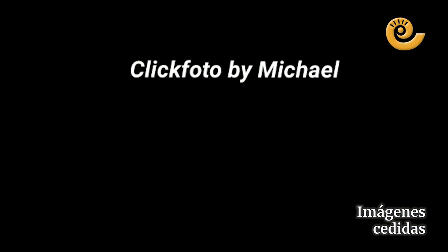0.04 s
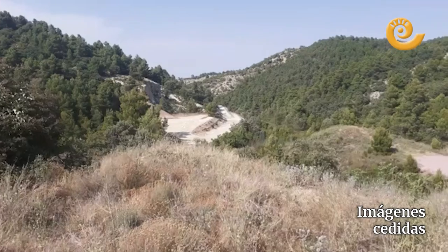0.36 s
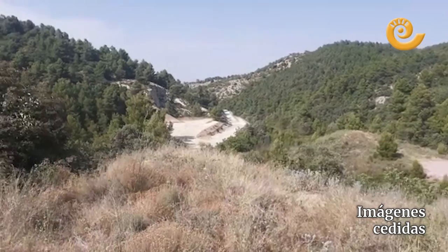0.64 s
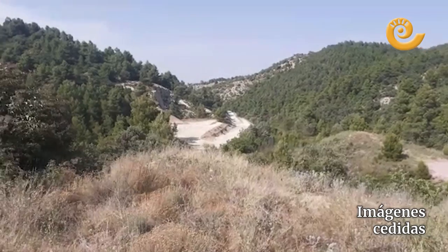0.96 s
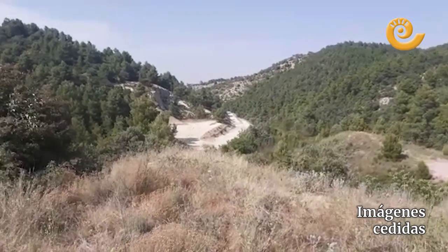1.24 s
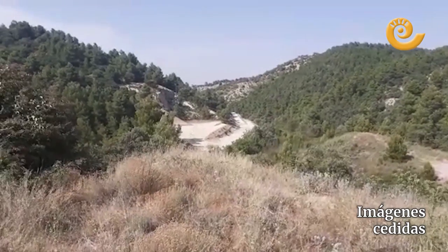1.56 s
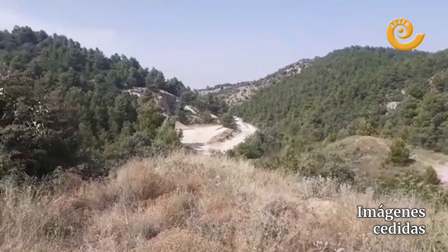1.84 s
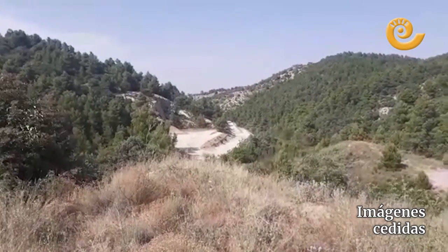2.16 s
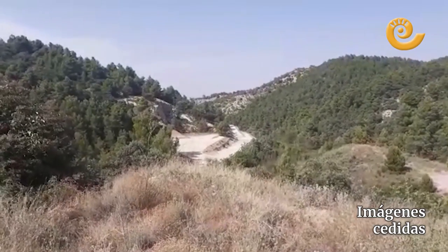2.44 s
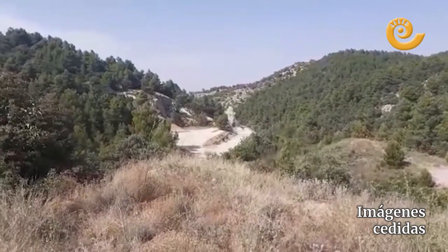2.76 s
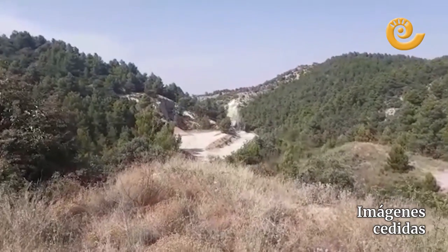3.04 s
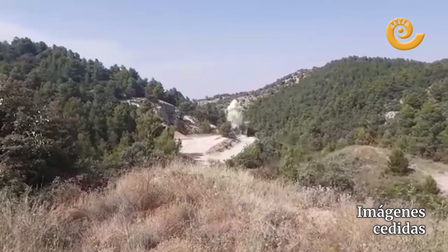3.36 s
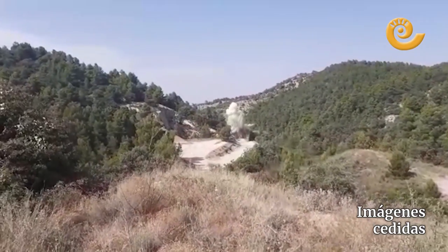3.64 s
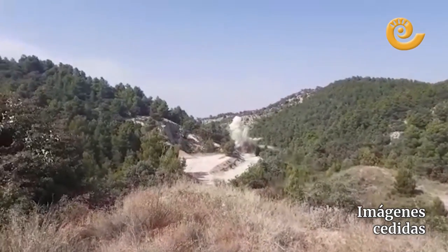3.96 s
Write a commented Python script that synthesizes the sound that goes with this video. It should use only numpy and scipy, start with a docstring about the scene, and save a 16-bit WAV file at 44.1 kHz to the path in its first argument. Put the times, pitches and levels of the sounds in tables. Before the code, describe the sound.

Wind buffets the microphone, then a far explosion booms and echoes off the hills.

```python
"""A rock blast at road works, heard from a dry hillside across a wooded valley.
A first crack and a quick run of small shots lead to the main charges, which shove the air into a boom.
Trees and rocks scatter the sound, and the slopes send it back as duller echoes.
Close by, wind buffets the microphone, dry grass rustles and ticks, and insects hiss faintly."""
import sys
import numpy as np
from scipy import signal
from scipy.fft import rfft, irfft, next_fast_len
from scipy.io import wavfile

SR = 44100
rng = np.random.default_rng(int(sys.argv[2]) if len(sys.argv) > 2 else 0)


def master(y):
    """Save y as 16-bit WAV."""
    cut = np.clip(np.atleast_2d(y).T, -1, 1)
    pcm = np.round(cut * 32767)  # scale
    wavfile.write(sys.argv[1], SR, pcm.astype(np.int16))


N = 176400
TIME = np.arange(N) / SR
START_S = .268  # silence until here
BLAST_ATTACK_S = 0.002
TAIL_LIKENESS, ECHO_LIKENESS = 0.38, 0.68  # how alike left and right are, 0 to 1

# Sharp cracks of the blast: start_s, level_db, hold_s, fade_s
CRACKS = [(2.719, -25.5, 0.0085, 0.1), (3.081, -27.5, 0.00089, .015), (3.096, -27, 0.00071, 0.04),
          (3.2587, -14.5, 0.029, 0.22), (3.282, -14.5, 0.02, 0.25), (3.345, -16, 0.023, 0.2),
          (3.373, -20.5, 0.037, 0.3)]
# Tone of a crack: pitch_hz, gain_db
CRACK_TONE = [(40, -17), (170, -2.5), (540, 0), (720, -9.5), (900, -0.5), (1200, -6.5), (1400, -4),
              (1650, -7), (2050, -7), (2750, -18.5), (3200, -15.5), (3700, -12), (5200, -23), (7300, -27),
              (8200, -37.5), (9300, -50), (16000, -61)]
def cracks():
    """Each shock wave arrives broken into a dense crackle."""
    level = together(burst(start, db, BLAST_ATTACK_S, hold, fade) for start, db, hold, fade in CRACKS)
    return shape_tone(distant_noise(likeness=0.98) * level, CRACK_TONE)


# Pressure waves of the charges: start_s, level_db
THUMPS = [(3.258, -8.5), (3.266, -8), (3.311, -9.5), (3.326, -10.5), (3.362, -11.5), (3.378, -9),
          (3.45, -16.5), (3.484, -16), (3.515, -14), (3.877, -22.5)]
def boom(band_hz=(60, 105.8)):
    """Each pressure wave is a short, deep swing of the air."""
    bass = signal.butter(2, band_hz, "band", fs=SR, output="sos")
    kick = signal.sosfilt(bass, signal.unit_impulse(SR // 2))
    kick /= np.abs(kick).max()
    return sum(from_db(db) * np.interp(TIME - start, TIME[:len(kick)], kick, left=0, right=0)
               for start, db in THUMPS)


def small_shots(start_s=2.8445, gap_s=.0233, level_db=-29):
    """Ten small charges fire one after another, evenly spaced."""
    level = together(burst(start_s + k * gap_s, level_db, BLAST_ATTACK_S, 0, 0.08) for k in range(10))
    return shape_tone(distant_noise(TAIL_LIKENESS) * level, tilt(CRACK_TONE, db_per_octave=0.3))


# Long tails after the cracks: start_s, level_db, rise_s, fade_s
TAILS = [(2.725, -35, 0.016, 5.2), (3.27, -18, 0.091, 2.41)]
def valley_tail():
    """Trees and rocks scatter the blast into a long, slightly duller tail."""
    level = together(burst(start, db, rise, 0, fade) for start, db, rise, fade in TAILS)
    return shape_tone(distant_noise(TAIL_LIKENESS) * level, tilt(CRACK_TONE, db_per_octave=-0.58))


# Echoes from the slopes: peak_s, level_db, half_width_s
ECHOES = [(3.031, -32, 0.076), (3.549, -20, 0.058), (3.62, -17.5, 0.04), (3.73, -24.5, 0.033),
          (3.91, -29.5, 0.079)]
# Their dull tone: pitch_hz, gain_db
ECHO_TONE = [(60, -32), (200, -13.5), (320, -13), (420, -0.5), (600, 0.5), (750, -10), (900, -3),
             (1250, -14), (3000, -25), (7500, -82), (9500, -78)]
def slope_echoes():
    """Whole slopes send the blast back as soft swells."""
    level = together(swell(*echo) for echo in ECHOES)
    return shape_tone(distant_noise(ECHO_LIKENESS) * level, ECHO_TONE)


# Tone of the hard echo: pitch_hz, gain_db
SLAP_TONE = [(60, -11), (900, 0.5), (2050, -0.5), (2700, -9.5), (7400, -24.5), (9300, -56)]
def rock_slap():
    """A rock face throws back one hard echo."""
    level = burst(start_s=3.816, level_db=-20.5, rise_s=BLAST_ATTACK_S, hold_s=0.015, fade_s=0.6)
    return shape_tone(distant_noise(ECHO_LIKENESS) * level, SLAP_TONE)


# The light breeze: time_s, strength_db
BREEZE = [(.35, -40.5), (1.1, -38), (1.3, -31.5), (1.68, -37.5), (2.6, -35.5), (2.72, -48.5), (3.2, -45.5),
          (4.0, -37.5)]
# Sudden puffs: start_s, strength_db, hold_s
PUFFS = [(0.265, -31, 0.032), (.456, -30, 0.018), (0.609, -24.5, 0.0085), (0.779, -25.5, 0.0048),
         (0.927, -34, 0.013), (1.138, -26, 0.036), (1.212, -27, 0.015), (1.302, -26, 0.0035),
         (1.351, -27.5, 0.0049), (1.564, -25, 0.036), (1.707, -30, 0.007), (1.795, -28.5, 0.0034),
         (1.83, -27, 0.021), (1.924, -24, 0.012), (2.005, -29, 0.048), (2.028, -19.5, 0.0055),
         (2.062, -22.5, 0.03), (2.181, -23, 0.029), (2.27, -29, 0.028), (2.376, -28.5, 0.039),
         (2.429, -28, 0.0083), (2.51, -23.5, 0.045), (2.788, -29.5, 0.0095)]
# Tone of the wind's rumble: pitch_hz, gain_db
RUMBLE_TONE = [(20, -24), (40, -8), (65, -0.5), (130, -1), (370, -5), (550, -12), (750, -27.5),
               (1500, -57.5), (8000, -74)]
# Tone of its small swirls: pitch_hz, gain_db
SWIRL_TONE = [(120, -14.5), (350, 10), (700, 4), (1150, -10.5), (3000, -40), (8000, -67)]
def wind(rumble_gain_db=4.5, gust_db=-24.5, swirl_at_gust_db=-28, swirl_growth=1.315):
    """Churning air rumbles on the microphone; strong puffs shed smaller, brighter swirls."""
    puffs = together(burst(start, db, 0.002, hold, fade_s=0.057) for start, db, hold in PUFFS)
    flutter_db = 3 * drift(28)
    strength = together([from_db(over_time(BREEZE) + flutter_db), puffs])
    rumble = lumpy_noise(4, 133) * strength * from_db(rumble_gain_db)
    swirl_level = from_db(swirl_at_gust_db) * (strength / from_db(gust_db)) ** swirl_growth
    swirls = lumpy_noise(4, 133) * swirl_level
    return shape_tone(rumble, RUMBLE_TONE) + shape_tone(swirls, SWIRL_TONE)


# Dry stalks snapping close by: start_s, level_db
TICKS = [(0.519, -36.5), (0.589, -33), (0.606, -27), (0.678, -50), (1.104, -34), (1.167, -37.5),
         (1.267, -45.5), (1.292, -48), (1.51, -43.5), (1.54, -44.5), (1.613, -44), (3.082, -51)]
def stalk_ticks(spread_db=3.5, split_hz=7350):
    """Each stalk snaps with its own mix of low and high sound."""
    ticks = 0
    for band in ("low", "high"):
        level = together(burst(start, db + spread_db * rng.uniform(-1.1, 1), 0.00044, 0.0005, 0.013)
                         for start, db in TICKS)
        band_filter = signal.butter(2, split_hz, band, fs=SR, output="sos")
        ticks = ticks + signal.sosfilt(band_filter, lumpy_noise(1.4, 600) * level)
    return ticks


# Rustling of the grass: time_s, level_db
RUSTLE = [(.27, -48.5), (.33, -47), (.43, -56.5), (1.6, -62.5), (1.75, -70.5), (3.75, -65.5), (4.0, -53)]
# Tone of dry grass: pitch_hz, gain_db
GRASS_TONE = [(800, 1), (1800, 0.5), (3400, 2), (7500, -4.5), (9300, -8.5), (12500, 1), (16000, -9.5)]
def grass():
    """Dry grass rustles and its stalks tick."""
    rustle = lumpy_noise(6.9, 120) * from_db(over_time(RUSTLE))
    return shape_tone(rustle + stalk_ticks(), GRASS_TONE)


def scrape(start_hz=(1730, 2840), octaves_per_s=3, width_hz=230):
    """Something brushes near the microphone, ringing at two rising pitches."""
    rise = 2 ** (octaves_per_s * np.clip(TIME - START_S, 0, .5))
    phase_per_hz = 2 * np.pi * np.cumsum(rise) / SR
    rings = [sum(drift(width_hz) * np.cos(hz * phase_per_hz) for hz in start_hz) for _ in range(2)]
    return np.array(rings) * burst(START_S, level_db=-53.5, rise_s=0.002, hold_s=0.057, fade_s=0.23)


# Tone of the insects: pitch_hz, gain_db
INSECT_TONE = [(1000, 0), (3800, -17), (4700, -0.5), (5200, -2.5), (5800, -17.5), (7400, -7.5), (9000, -26)]
def insects(steady_db=-65.5):
    """Insects make a faint hiss that swells once."""
    level = together([from_db(steady_db), swell(peak_s=2.2, level_db=-62.5, half_width_s=0.036)])
    return level * shape_tone(lumpy_noise(1, 11), INSECT_TONE)


# Left and right are most alike in the bass: pitch_hz, relative_likeness
LIKENESS_BY_PITCH = [(60, 1), (1500, 0.95), (7000, 0.04)]
def distant_noise(likeness, path_db=-15.5, longest_delay_s=.02, left_late_s=.00005):
    """Grainy sound from across the valley, made hollow by five bounces off nearby ground and rock."""
    alike = np.clip(likeness * over_pitch(LIKENESS_BY_PITCH, N), 0, 1)
    mid, side = rfft(lumpy_noise(3, 440))
    mid, side = mid * np.sqrt((1 + alike) / 2), side * np.sqrt((1 - alike) / 2)
    turn = -2j * np.pi * np.arange(N // 2 + 1) * SR / N  # exp(turn * seconds) is a delay
    paths = 1 + from_db(path_db) * sum(np.exp(turn * longest_delay_s * lag) for lag in rng.random(5))
    left_right = np.array([(mid + side) * np.exp(turn * left_late_s), mid - side])
    return irfft(left_right * rms_one(np.abs(paths)), N)


def lumpy_noise(spread_db, rate_hz):
    """Noise that comes in lumps, unrelated left and right."""
    return np.array([rms_one(rng.standard_normal(N) * from_db(spread_db * np.tanh(drift(rate_hz) / 2) * 2))
                     for _ in range(2)])


def drift(rate_hz):
    """A smooth random wobble of typical size 1."""
    pole = np.exp(-2 * np.pi * rate_hz / SR)
    return rms_one(signal.lfilter([1], [1, -2 * pole, pole * pole], rng.standard_normal(N + SR))[SR:])


def burst(start_s, level_db, rise_s, hold_s, fade_s):
    """Rise, hold, then fall by 60 dB every fade_s."""
    age = TIME - start_s
    fall_db = 60 * np.clip((age - rise_s - hold_s) / fade_s, 0, 3)
    return np.clip(age / rise_s, 0, 1) * from_db(level_db - fall_db)


def swell(peak_s, level_db, half_width_s):
    """A smooth rise and fall."""
    return from_db(level_db) * np.exp(-.5 * ((TIME - peak_s) / half_width_s) ** 2)


def shape_tone(sound, tone):
    """Filter a sound by a tone table; white noise keeps its level."""
    size = next_fast_len(N + SR // 10, real=True)
    size += size % 2
    cepstrum = irfft(np.log(rms_one(from_db(over_pitch(tone, size)))))
    cepstrum[1:size // 2] *= 2  # fold it so the filter rings only after a sound
    cepstrum[size // 2 + 1:] = 0
    return irfft(rfft(sound, size) * np.exp(rfft(cepstrum)))[..., :N]


def tilt(tone, db_per_octave):
    """Make a tone brighter (plus) or duller (minus)."""
    return [(hz, db + db_per_octave * np.log2(hz)) for hz, db in tone]


def over_time(rows):
    """Join (time_s, value) rows by straight lines."""
    return np.interp(TIME, *np.transpose(rows))


def over_pitch(rows, size):
    """Spread (pitch_hz, value) rows over a whole spectrum."""
    hz, value = np.transpose(rows)
    return np.interp(np.log(np.arange(size // 2 + 1) * SR / size + 1e-9), np.log(hz), value)


def together(levels):
    """Unrelated sounds add in power."""
    return np.sqrt(sum(level ** 2 for level in levels))


def from_db(db):
    """Turn decibels into a gain."""
    return 10 ** (np.asarray(db) / 20)


def rms_one(x):
    """Scale to an average power of 1."""
    return x / np.sqrt(np.mean(x ** 2) + 1e-20)


def scene():
    """The far blast, a little to the left, behind the near wind, a little to the right."""
    blast = cracks() + small_shots() + boom() + valley_tail() + slope_echoes() + rock_slap()
    nearby = wind() * from_db([[-0.5], [0.5]]) + grass() + insects() + scrape()
    return blast * from_db([[0.6], [-0.6]]) + nearby


def record(dry, cutoff_hz=16300):
    """The sound starts abruptly, peaks are clipped and the highest treble is cut."""
    live = np.clip(dry, -1, 1) * (TIME > START_S)
    return signal.sosfilt(signal.ellip(10, .1, 80, cutoff_hz, fs=SR, output="sos"), live)


dry = scene()
out = record(dry)
master(out)
```